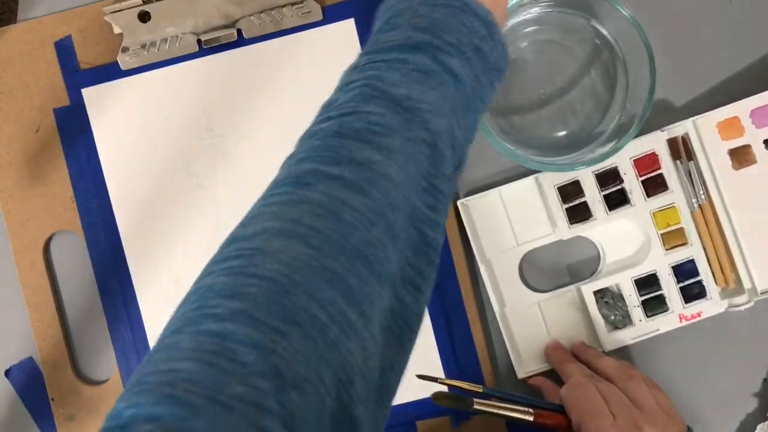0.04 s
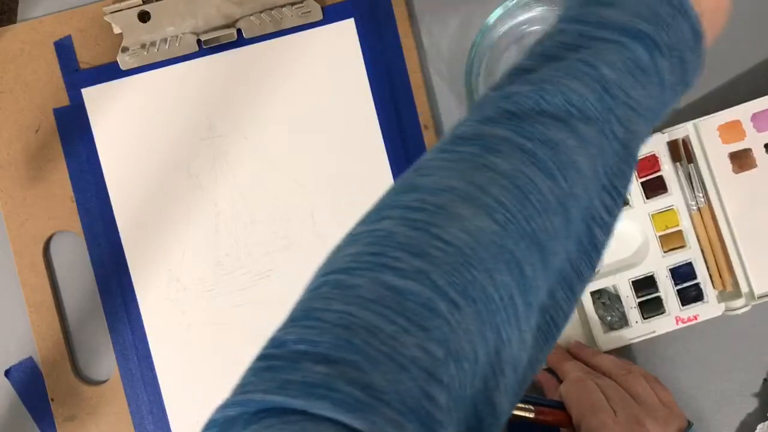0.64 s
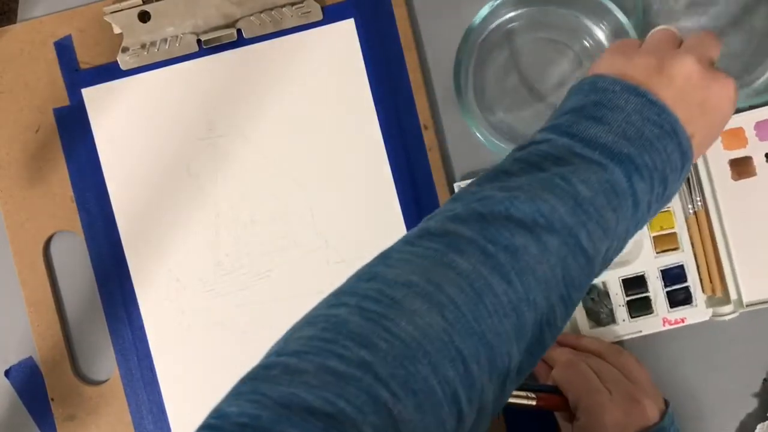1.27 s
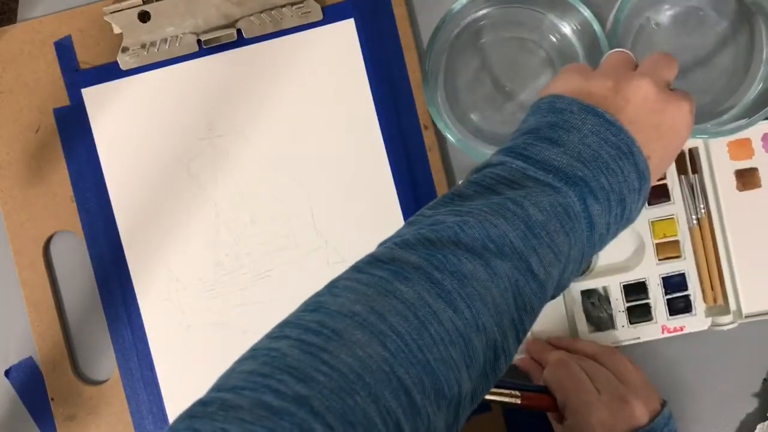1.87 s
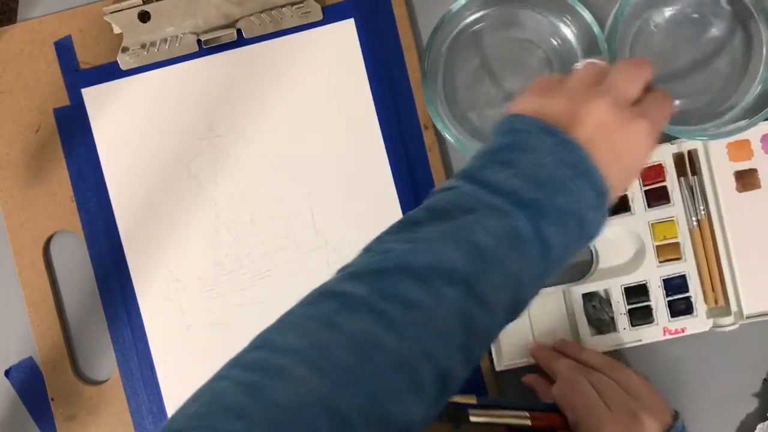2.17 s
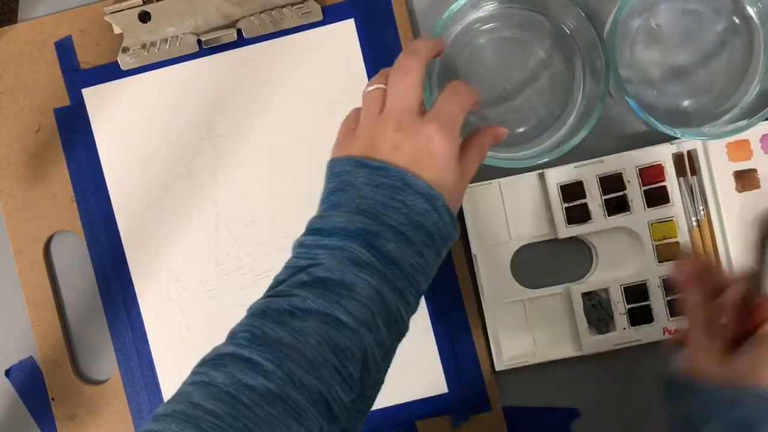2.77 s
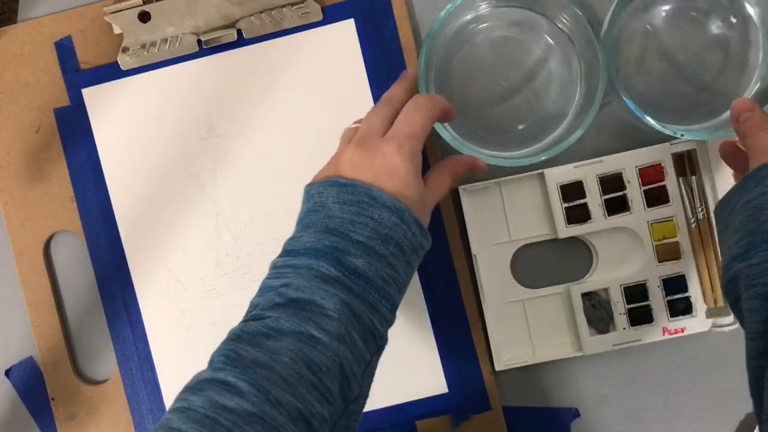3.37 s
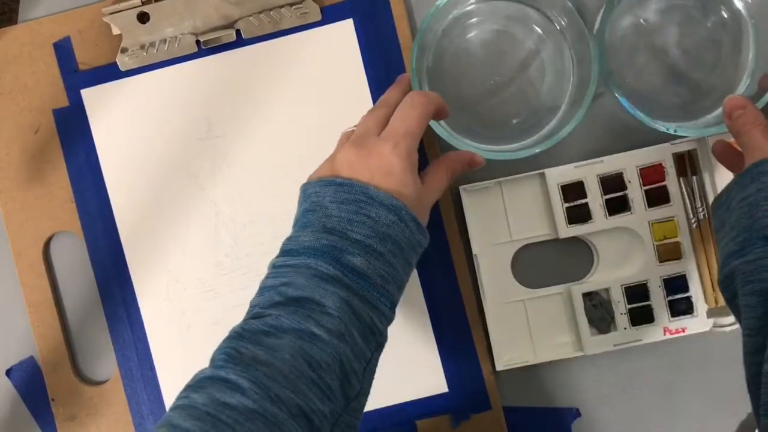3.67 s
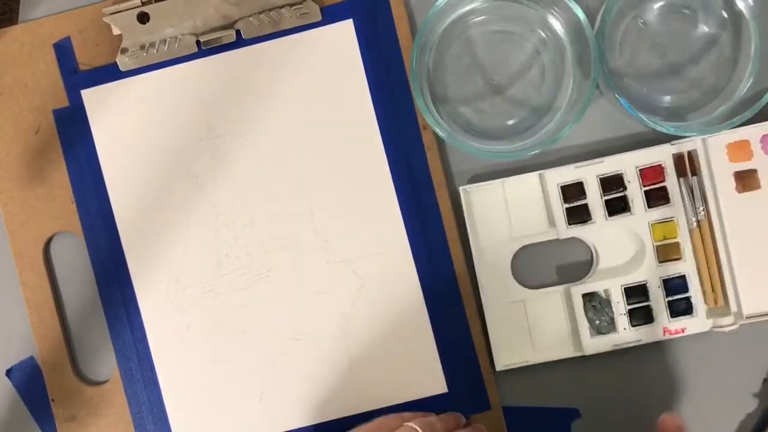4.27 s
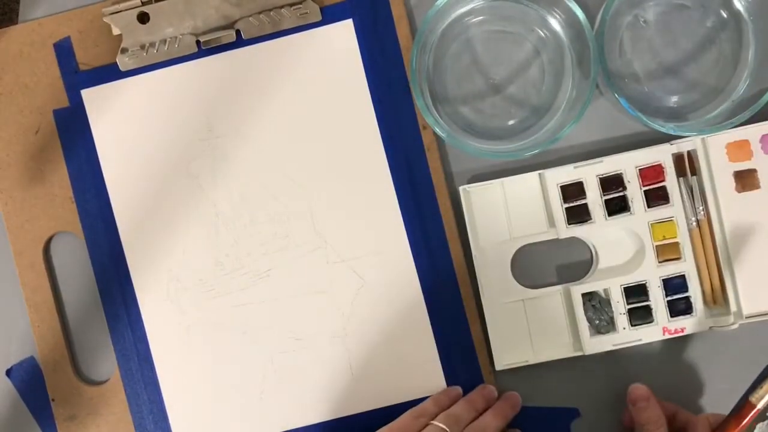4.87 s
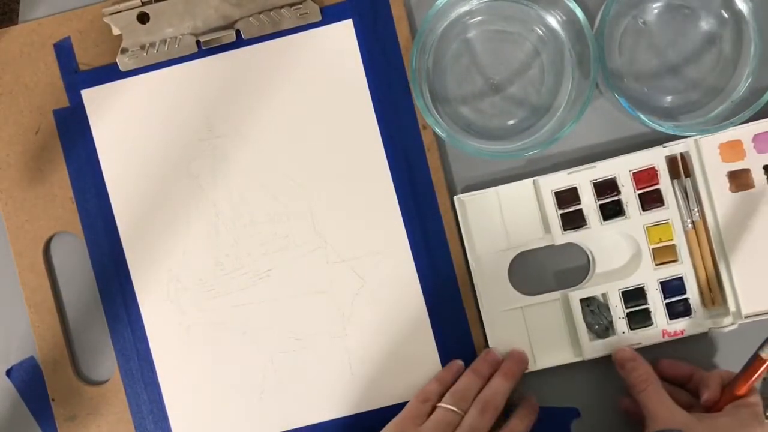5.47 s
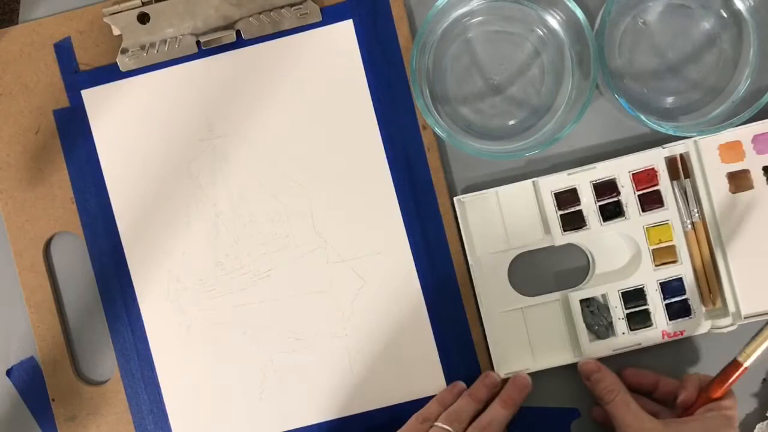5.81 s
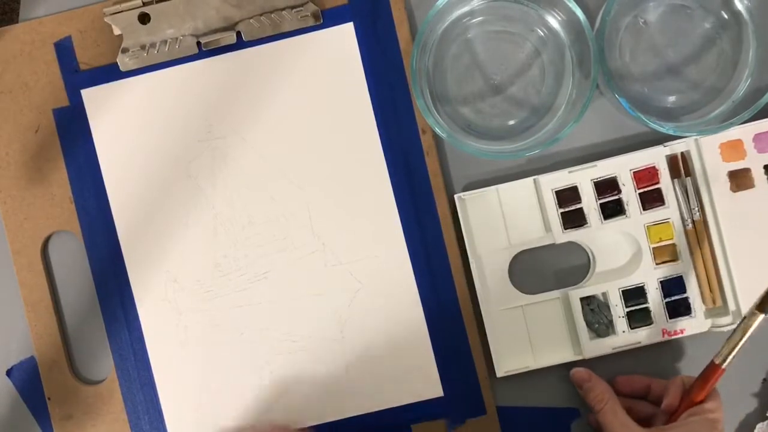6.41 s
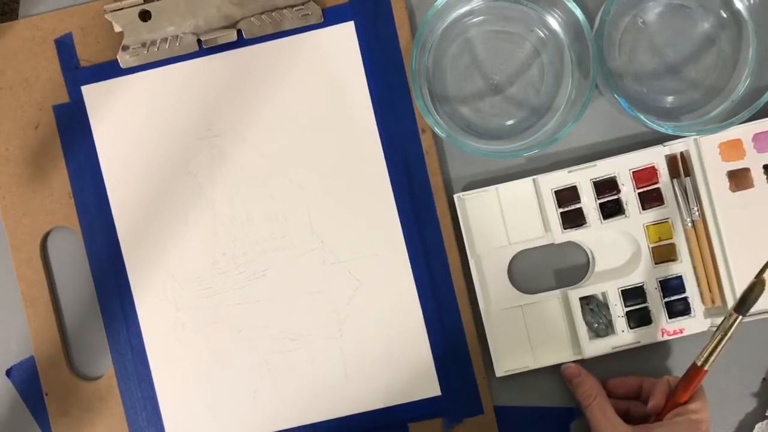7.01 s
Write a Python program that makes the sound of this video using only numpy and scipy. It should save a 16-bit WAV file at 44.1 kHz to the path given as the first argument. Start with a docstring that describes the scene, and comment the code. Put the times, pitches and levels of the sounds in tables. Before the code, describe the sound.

A glass dish is dragged across a table with a rumbling, gritty scrape, heard from close above in a small room. At about 0.7 seconds it hits a second dish with a sharp, briefly ringing clink, the loudest sound. It slides again more gently, with a faint sleeve rustle, until a knock, a light clink and plastic taps around 1.3 seconds. A last weak push and soft bumps fade by 2 seconds. After a lull, a thud and a bright chattering glass clink come at about 3.5 seconds. A hand knocks on the drawing board at 4.3 seconds. From 4.5 to 5.8 seconds a plastic palette is nudged with faint scrapes, ticks and several dull knocks. A hand brushes softly over paper, clearest around 6.4 seconds, and one more small nudge comes near 7 seconds. Quiet room rumble and hiss lie underneath.

```python
"""A table in a small room, heard from just above, where painting things are being arranged.
A glass water dish is dragged along by stick-slip friction and clinks into a second one; later the two
chatter again. Each impact excites the damped modes of the glass and of the table top. A plastic palette
is nudged and tapped, hands knock on the drawing board and brush over the paper, a sleeve rustles and a
fingertip rubs a rim. Short reverberation follows, over a quiet rumble, hiss and thin whine."""
import sys
import numpy as np
from scipy import signal
from scipy.fft import rfft, irfft, next_fast_len
from scipy.io import wavfile
from scipy.ndimage import uniform_filter1d

SR = 44100
rng = np.random.default_rng(int(sys.argv[2]) if len(sys.argv) > 2 else 0)


def unload_audio(sound):
    """Save the sound as a 16-bit wav file, at the path given as the first command line argument."""
    columns = np.transpose(np.atleast_2d(sound))
    # keep every value between -1 and 1, then stretch to whole-number steps
    steps = np.round(np.clip(columns, -1, 1) * 32767)
    wavfile.write(sys.argv[1], SR, steps.astype(np.int16))


N = 310905
TIME = np.arange(N) / SR
RING_TIME = TIME[:SR // 2]

# Glass meets glass. Each row: start in seconds, level in dB, first gap in seconds, ratio of each gap to
# the last, loss per bounce in dB, pitch favoured by the graze in Hz, by later touches in Hz, dish index.
CLINKS = [(0.668, -19, 0.009, 0.55, 6, 1400, 6500, 0), (0.791, -45.5, 0.0085, 0.8, 2, 1400, 1700, 1),
          (1.302, -40.5, 0.005, 1.2, 8, 5000, 5000, 1), (3.182, -61, 0.0087, 0.8, 6, 1400, 1700, 1),
          (3.4742, -25, 0.0065, 0.9, 3.5, 3600, 3300, 1)]
# A hand or dish comes down on the table. Each row: start in seconds, thud level in dB, tick level in dB,
# favoured pitch in Hz, fall-off around that pitch in dB per octave.
KNOCKS = [(0.812, -35, -60, 100, 3.5), (1.333, -31.5, -39.5, 143, 20), (1.7, -45.5, -75, 120, 8),
          (1.988, -42.5, -59, 160, 10.5), (3.422, -36, -58, 194, 13), (4.261, -39.5, -50, 630, 16),
          (4.268, -32, -73, 290, 4.5), (4.526, -49, -62, 170, 13), (5.203, -44.5, -66, 390, 1),
          (5.322, -44.5, -63, 146, 30), (5.423, -39.5, -50, 185, 6), (5.597, -48.5, -70, 161, 18),
          (5.816, -41, -65, 165, 10)]
# Light taps on palette and board. Each row: start in seconds, level in dB, tilt in dB per octave.
TAPS = [(1.302, -37.5, 1.5), (1.354, -45.5, -1.5), (1.427, -51, -1.5), (2.081, -62, 3.5),
        (4.109, -61.5, -2.5), (4.667, -58.5, -3.5), (5.273, -61.5, -5.5)]
# Pushes of the dish, each gentler than the last, and of the palette.
# Each row: start in seconds, length in seconds, table rumble in dB, scrape in dB.
DISH_DRAGS = [(-0.04, 0.76, -36, -44), (0.85, 0.45, -44, -52.5), (1.42, 0.32, -54.5, -63)]
PALETTE_NUDGES = [(3.26, 0.2, -55.5, -65), (4.56, 0.33, -75, -71), (4.78, 0.23, -77, -67),
                  (5.03, 0.06, -79, -67.5), (5.3, 0.18, -54.5, -65), (5.5, 0.29, -63, -63.5),
                  (6.9, 0.12, -53, -67.5)]
# A hand brushes the paper. Each row: start in seconds, length in seconds, hiss in dB, soft rub in dB.
HAND_STROKES = [(3.09, 0.05, -73.5, -71), (3.86, 0.11, -82, -69), (4.78, 0.3, -72, -88),
                (5.54, 0.29, -69, -74), (5.94, 0.073, -90, -67), (6.05, 0.07, -68.5, -65.5),
                (6.368, 0.13, -60, -67.5), (6.46, 0.11, -61, -63), (6.885, 0.12, -68.5, -65)]
# The sleeve moves with the arm. Each row: start in seconds, length in seconds, level in dB.
SLEEVE_RUSTLES = [(0.76, 0.46, -62), (4.2, 0.04, -68.5), (4.365, 0.015, -56.5)]

# Normal modes of dish 0, dish 1 and the table top.
# Each row: frequency in Hz, bandwidth in Hz before any damping factor, relative level in dB.
LEFT_DISH_MODES = [(1340, 49, 0), (1510, 36, -3), (2090, 65, -3), (3080, 81, 0), (3210, 20, -2),
                   (3500, 38, -11), (3790, 60, -11), (4500, 24, -19), (5310, 170, -2), (5870, 37, -9),
                   (6160, 66, -13), (6830, 17, -13), (6970, 57, -11), (7950, 54, -14), (8490, 55, -7),
                   (11600, 42, -16)]
RIGHT_DISH_MODES = [(1290, 19, -7), (1480, 30, -3), (1880, 41, 0), (2060, 30, -1), (3270, 130, -5),
                    (3640, 15, -7), (4120, 28, -17), (4720, 32, -17), (5030, 43, -21), (5880, 120, -9),
                    (6000, 15, -10), (6200, 23, -13), (7180, 49, -24), (8660, 46, -16), (11500, 31, -25),
                    (11900, 61, -27)]
TABLE_MODES = [(58.5, 12, -13.5), (100, 20, 1.5), (131.3, 32, -1.5), (171.5, 21, -4.5), (211.4, 15, -4),
               (312, 44, -7.5), (421.4, 39, -10.5), (593, 60, -27.5), (687, 78, -21.5), (1020, 160, -23)]
# How each dish sits on the table. Each row: damping factor, crack level in dB, after-ring level in dB.
DISH_SEATING = [(1.1, -4, -9.5), (2.6, -6, -17)]

# Spectra of the impacts, the friction and the room tone. Each row: frequency in Hz, relative level in dB.
GLASS_CRACK_SPECTRUM = [(600, -4), (1120, -26.5), (1450, -3.5), (2150, 3.5), (2700, -19.5), (3200, -2),
                        (3650, -2.5), (4350, -19.5), (5300, -9.5), (5900, 0), (7600, -32), (8550, -5.5),
                        (10000, -34.5), (11700, -16.5), (15000, -28)]
TAP_SPECTRUM = [(300, -16), (800, -5.5), (1400, -0.5), (2300, -5), (3300, 2), (5000, -6.5), (9000, -14.5),
                (15000, -27)]
DISH_SCRAPE_SPECTRUM = [(600, -10.5), (900, -5.5), (1240, 0.5), (1600, -3.5), (2000, -6), (2500, -2.5),
                        (3080, 0), (3700, -2.5), (4800, -7.5), (5400, -6.5), (7600, -14), (8750, -11),
                        (10500, -16.5), (15500, -18.5)]
PALETTE_SCRAPE_SPECTRUM = [(500, -4), (1000, 2), (1500, 1), (2300, 1), (3100, 11), (3900, 0), (4500, 0.5),
                           (6500, -4.5), (9000, -19), (15000, -10)]
HISS_SPECTRUM = [(1760, -30), (3000, -10.5), (4260, -3.5), (7830, -6.5), (8580, -2.5), (10500, -11.5),
                 (14600, -14.5), (16000, -9)]
SOFT_RUB_SPECTRUM = [(400, 0), (900, -1.5), (1350, 0.5), (2300, -8), (3200, -3.5), (5000, -18.5)]
ROOM_TONE_SPECTRUM = [(15, -55), (25, -21), (40, -6.5), (59, 3.5), (108, -7.5), (180, -12.5), (285, -16.5),
                      (754, -25), (840, -24.5), (1100, -26), (3250, -29), (4140, -30.5), (5000, -33),
                      (11900, -41), (16000, -36.5)]
# Reverberation of the room. Each row: frequency in Hz, time to decay by 60 dB in seconds.
ROOM_T60 = [(100, 0.52), (400, 0.19), (2000, 0.29), (6000, 0.2), (14000, .2)]

STROKE_ATTACK_S, STROKE_RELEASE_S = 0.013, 0.032
TICK_T60_S, THUD_LAG_S = 0.044, 0.0018  # the table answers just after the contact


def clinks(touches=6, graze_db=-3, thud_db=-5, thud_hz=210):
    """Inelastic collision: the dishes graze, hit fully and shake the table, then rebound more weakly."""
    out = np.zeros(N)
    for start, db, gap_s, gap_ratio, loss_db, graze_hz, favoured_hz, dish in CLINKS:
        add(out, start + gap_s + THUD_LAG_S, from_db(db + thud_db) * table_thud(thud_hz, focus_db=2))
        for k in range(touches):
            touch_db, touch_hz = (graze_db, graze_hz) if k == 0 else (-loss_db * (k - 1), favoured_hz)
            add(out, start, from_db(db + touch_db) * glass_touch(round(dish), touch_hz))
            start += gap_s * gap_ratio ** k
    return out


def glass_touch(dish, favoured_hz, focus_db=2, crack_t60_s=0.024, after_ring_hz=3300):
    """Damped free vibration: table and water absorb most of the ring; the middle modes sing on faintly."""
    damping, crack_db, after_ring_db = DISH_SEATING[dish]
    modes = [LEFT_DISH_MODES, RIGHT_DISH_MODES][dish]
    ring = ringing(favouring(modes, favoured_hz, focus_db), damping)
    after_ring = ringing(favouring(modes, after_ring_hz, focus_db=2), damping=0.29)
    clack = crack(favouring(GLASS_CRACK_SPECTRUM, favoured_hz, focus_db), crack_t60_s)
    return unit_blow(ring + from_db(after_ring_db) * after_ring + from_db(crack_db) * clack)


def dish_drag(fast_db=-43, slow_cut_hz=5000, rim_band_hz=(2850, 3350), rim_db=-9, grit_db=-10):
    """Sliding friction drives the table; as the dish slows, its rasp dulls and the rim's note emerges."""
    rumble, scrape = movements(DISH_DRAGS, attack_s=0.079, release_s=0.13, swells_db=(7, 0))
    slips = friction(DISH_SCRAPE_SPECTRUM, judder_db=1, wander_db=2)
    fast_rasp = unit_rms(slips + from_db(grit_db) * grit())
    rim = unit_rms(butter(fast_rasp, rim_band_hz, "band"))
    slow_rasp = butter(fast_rasp, slow_cut_hz, "low", order=1) + from_db(rim_db) * rim
    speed = np.clip(scrape / from_db(fast_db), 0, 1)
    rasp = speed * fast_rasp + (1 - speed) * slow_rasp
    boom = friction(response(TABLE_MODES), judder_db=1, wander_db=3)
    return rumble * boom + scrape * rasp


def grit(per_s=250, spread_db=3):
    """A Poisson process: specks of grit catch under the glass at independent random instants."""
    sizes = from_db(spread_db * np.minimum(rng.exponential(1, N), 4)) * rng.choice([-1, 1], N)
    catches = rng.random(N) < per_s / SR
    return coloured(sizes * catches, DISH_SCRAPE_SPECTRUM)


def knocks():
    """Impact on a plate: a dull tick of contact, then the boom of the table."""
    out = np.zeros(N)
    for start, thud_db, tick_db, favoured_hz, focus_db in KNOCKS:
        add(out, start, from_db(tick_db) * crack(TAP_SPECTRUM, TICK_T60_S, tilt_db=-2.5))
        add(out, start + THUD_LAG_S, from_db(thud_db) * table_thud(favoured_hz, focus_db))
    return out


def table_thud(favoured_hz, focus_db, top_hz=1500):
    """A soft, heavy contact acts as a low-pass filter, exciting the low modes of the table top."""
    boom = ringing(favouring(TABLE_MODES, favoured_hz, focus_db), damping=0.8, rise_s=0.00097)
    return butter(boom, top_hz, "low")


def taps():
    """Heavy damping in plastic and wood reduces each tap to a dry tick."""
    out = np.zeros(N)
    for start, db, tilt_db in TAPS:
        add(out, start, from_db(db) * crack(TAP_SPECTRUM, TICK_T60_S, tilt_db))
    return out


def palette_nudges():
    """Forced vibration: light plastic scrapes and shakes the table, gathering speed until it stops."""
    rumble, scrape = movements(PALETTE_NUDGES, attack_s=0.039, release_s=0.048, swells_db=(1, 1))
    modes = favouring(TABLE_MODES, hz=300, focus_db=2)
    boom = friction(response(modes), judder_db=-2.5, wander_db=3)
    rasp = friction(PALETTE_SCRAPE_SPECTRUM, judder_db=-0.5, wander_db=3.5)
    return rumble * boom + scrape * rasp


def paper_brushing():
    """Friction noise on paper: as the hand flattens, the fingertips' hiss yields to the palm's soft rub."""
    hiss, rub = movements(HAND_STROKES, STROKE_ATTACK_S, STROKE_RELEASE_S, swells_db=(-2, 3.5))
    fingertips = friction(HISS_SPECTRUM, judder_db=-0.5, wander_db=4)
    palm = friction(SOFT_RUB_SPECTRUM, judder_db=5, wander_db=2)
    return hiss * fingertips + rub * palm


def sleeve(low_hz=8000):
    """Friction of knitted cloth gives only the highest part of the brushing hiss."""
    level, = movements(SLEEVE_RUSTLES, STROKE_ATTACK_S, STROKE_RELEASE_S, swells_db=(0,))
    hiss = friction(HISS_SPECTRUM, judder_db=6.5, wander_db=2)
    return level * unit_rms(butter(hiss, low_hz, "high"))


def rim_rub(start_s=2.72, length_s=0.028, db=-62, band_hz=(1300, 1600)):
    """Narrow-band excitation: a fingertip slipping on the rim wakes only the lowest notes of the glass."""
    notes = unit_rms(butter(rng.standard_normal(N), band_hz, "band"))
    return from_db(db) * gesture(start_s, length_s, STROKE_ATTACK_S, release_s=0.012, swell_db=0) * notes


def ringing(modes, damping, rise_s=0.00087, spread_db=1.5):
    """Modal superposition: decaying sinusoids, among which each blow shares its force differently."""
    hz, width, db = np.transpose(modes)[:, :, None]
    amplitudes = width * from_db(db + spread_db * rng.standard_normal(db.shape))
    waves = np.sin(2 * np.pi * (hz * RING_TIME + rng.random(hz.shape)))
    decays = np.exp(-np.pi * damping * width * RING_TIME)
    rise = 1 - np.exp(-RING_TIME / rise_s)
    return unit_blow(np.sum(amplitudes * waves * decays, axis=0) * rise)


def crack(spectrum, t60_s, tilt_db=0):
    """Modal overlap: the many short-lived modes of a blow merge into decaying noise."""
    noise = coloured(rng.standard_normal(len(RING_TIME)), spectrum, tilt_db)
    return unit_blow(noise * from_db(-60 * RING_TIME / t60_s))


def favouring(table, hz, focus_db):
    """Selective excitation: a blow's place and softness favour one pitch; the rest fall off per octave."""
    weighted = np.array(table, float)
    weighted[:, -1] -= focus_db * np.abs(np.log2(weighted[:, 0] / hz))
    return weighted


def friction(spectrum, judder_db, wander_db, lowest_band_hz=250):
    """Stick-slip: tiny slips bunch as the grip varies; each octave swells alone as the contact moves."""
    size = next_fast_len(N)
    slips = (rng.random(size) < 0.3) * rng.standard_normal(size)
    bins = rfft(coloured(slips, spectrum))
    octave = np.log2(np.maximum(np.fft.rfftfreq(size, 1 / SR) / lowest_band_hz, 1))
    bands = (irfft(bins * np.maximum(1 - np.abs(octave - k), 0), size)[:N] for k in range(7))
    wandering = sum(band * from_db(wander_db * drift(corner_hz=10)) for band in bands)
    return unit_rms(wandering * from_db(judder_db * drift(corner_hz=17)))


def response(modes):
    """Resonance curves add in power under a rough push. Each row returned: frequency in Hz, level in dB."""
    hz, width, db = np.transpose(modes)[:, :, None]
    drive_hz = np.geomspace(30, 4000, 500)
    power = from_db(2 * db) / (1 + ((drive_hz ** 2 - hz ** 2) / (drive_hz * width)) ** 2)
    roll_off = 1 + (drive_hz / hz.max()) ** 8
    return np.column_stack([drive_hz, 10 * np.log10(power.sum(axis=0) / roll_off)])


def movements(rows, attack_s, release_s, swells_db):
    """One amplitude envelope for each level column; where movements overlap, the strongest prevails."""
    return [np.max([from_db(levels[k]) * gesture(start, length, attack_s, release_s, swell_db)
                    for start, length, *levels in rows], axis=0)
            for k, swell_db in enumerate(swells_db)]


def gesture(start, length, attack_s, release_s, swell_db):
    """Envelope of one hand movement: linear attack, a hold sloping by swell_db, exponential release."""
    t = TIME - start
    hold = from_db(swell_db * (np.clip(t / length, 0, 1) - 0.5))
    return np.clip(t / attack_s, 0, 1) * hold * np.exp(-np.maximum(t - length, 0) / release_s)


def drift(corner_hz, step=40, settling=2000):
    """Low-pass noise: a smooth random fluctuation of unit rms."""
    pole = np.exp(-2 * np.pi * corner_hz * step / SR)
    noise = rng.standard_normal(N // step + settling + 2)
    slow = signal.lfilter([1], [1, -2 * pole, pole * pole], noise)[settling:]
    return np.interp(np.arange(N) / step, np.arange(len(slow)), unit_rms(slow))


def coloured(x, spectrum, tilt_db=0):
    """Spectral shaping to unit rms, with a tilt per octave and a steep fall below the lowest point."""
    hz = np.maximum(np.fft.rfftfreq(len(x), 1 / SR), 1)
    shape = from_db(at_hz(spectrum, hz) + tilt_db * np.log2(hz))
    bass_fall = np.minimum(hz / spectrum[0][0], 1) ** 2
    return unit_rms(irfft(rfft(x) * shape * bass_fall, len(x)))


def at_hz(points, hz):
    """Interpolation on a logarithmic frequency axis."""
    point_hz, values = np.transpose(points)
    return np.interp(np.log(np.maximum(hz, 1)), np.log(point_hz), values)


def butter(x, hz, kind, order=2):
    """Causal Butterworth filter."""
    return signal.sosfilt(signal.butter(order, hz, kind, fs=SR, output="sos"), x)


def from_db(db):
    """Amplitude ratio of a level in decibels."""
    return 10 ** (np.asarray(db) / 20)


def unit_rms(x):
    """Normalisation to unit mean power."""
    return x / np.sqrt(np.mean(x ** 2) + 1e-20)


def unit_blow(x):
    """Normalisation to unit mean power over the loudest hundredth of a second."""
    return x / np.sqrt(uniform_filter1d(x ** 2, SR // 100, mode="constant").max())


def add(track, start_s, sound):
    """Linear superposition of a sound on a track."""
    start = round(start_s * SR)
    track[start:start + len(sound)] += sound[:N - start]


def room(x, wet_db=-11, gap_s=0.005):
    """Reverberation: diffuse reflections decay exponentially, lasting longest in the bass."""
    edges_hz = np.geomspace(40, 18000, 10)
    tail = np.zeros(len(RING_TIME))
    for low, high in zip(edges_hz, edges_hz[1:]):
        band = butter(rng.standard_normal(len(RING_TIME)), [low, high], "band")
        tail += band * from_db(-60 * RING_TIME / at_hz(ROOM_T60, np.sqrt(low * high)))
    tail *= np.clip(RING_TIME / gap_s - 1, 0, 1)  # reflections arrive after the direct sound
    tail /= np.sqrt(np.sum(tail ** 2))
    return x + from_db(wet_db) * signal.fftconvolve(x, tail)[:N]


def background(air_db=-61.5, whine_band_hz=(11700, 12000), whine_db=-82):
    """Stationary noise: broadband room rumble and hiss, with a thin narrow-band whine."""
    air = coloured(rng.standard_normal(next_fast_len(N)), ROOM_TONE_SPECTRUM)[:N]
    whine = unit_rms(butter(rng.standard_normal(N), whine_band_hz, "band", order=1))
    return from_db(air_db) * air + from_db(whine_db) * whine


def scene():
    """Superposition: everything on the table sounds into the same room, in one channel."""
    impacts = clinks() + knocks() + taps()
    rubbing = dish_drag() + palette_nudges() + paper_brushing() + sleeve() + rim_rub()
    return (room(impacts + rubbing) + background())[None]


def record(dry, bass_cut_hz=35, top_cut_hz=15900):
    """Band limiting: the microphone loses the deepest bass, and the top is cut steeply."""
    thinned = butter(dry, bass_cut_hz, "high")
    return signal.sosfilt(signal.ellip(10, 0.2, 70, top_cut_hz, fs=SR, output="sos"), thinned)


dry = scene()
out = record(dry)
unload_audio(out)
```